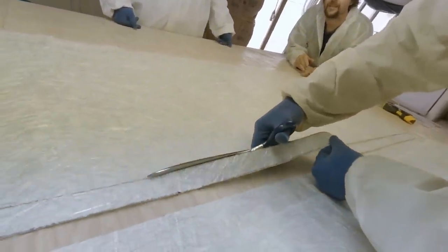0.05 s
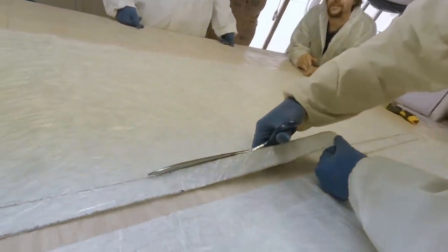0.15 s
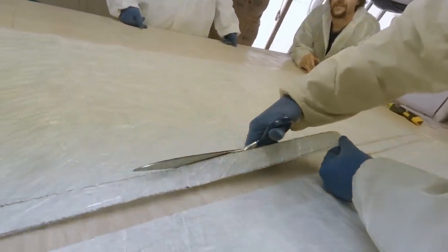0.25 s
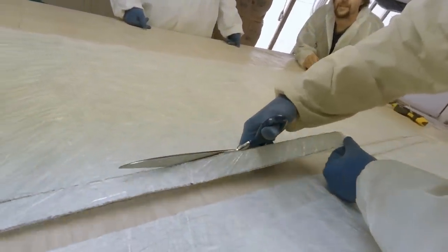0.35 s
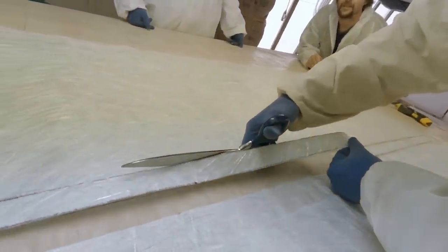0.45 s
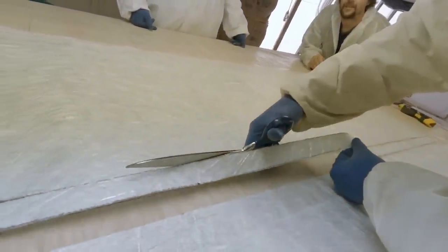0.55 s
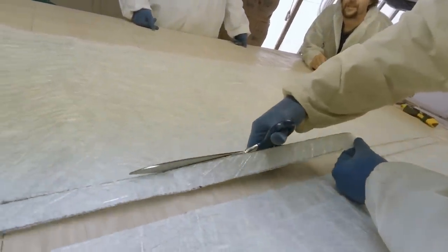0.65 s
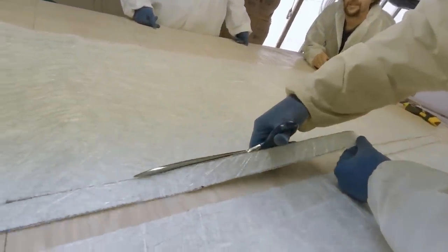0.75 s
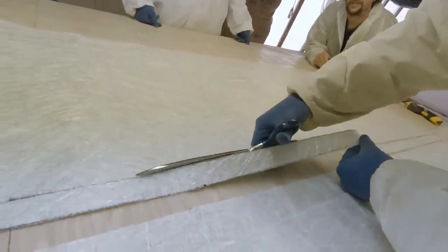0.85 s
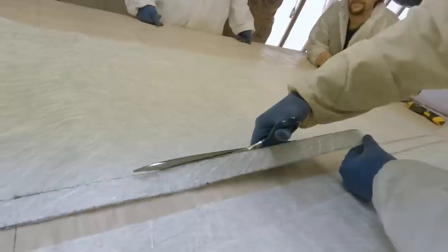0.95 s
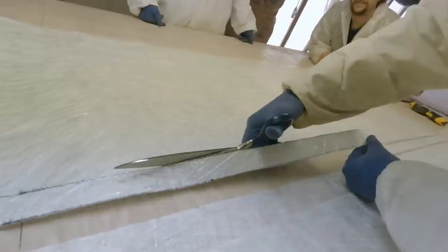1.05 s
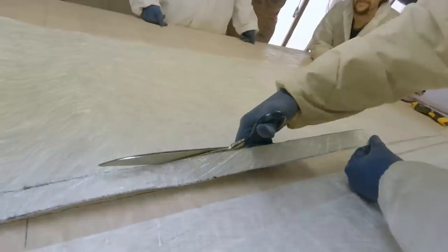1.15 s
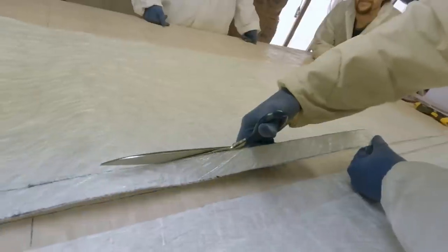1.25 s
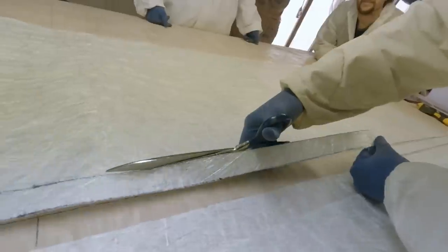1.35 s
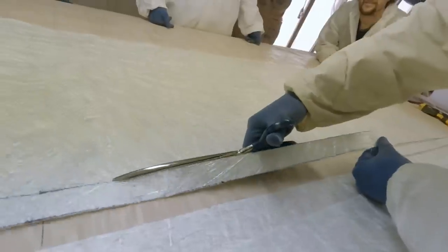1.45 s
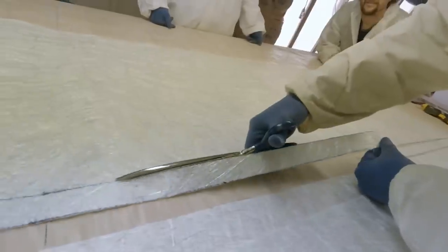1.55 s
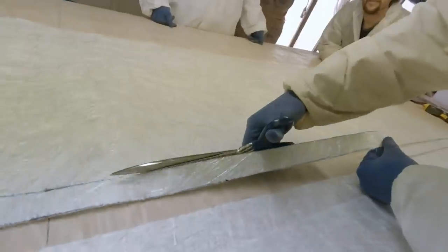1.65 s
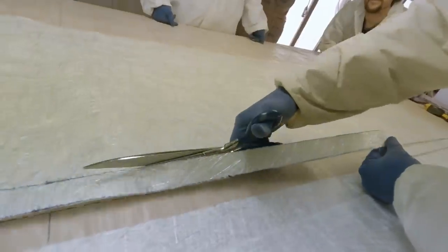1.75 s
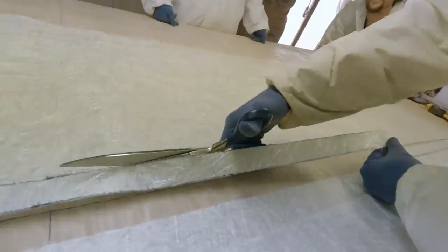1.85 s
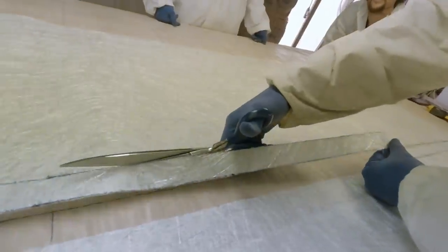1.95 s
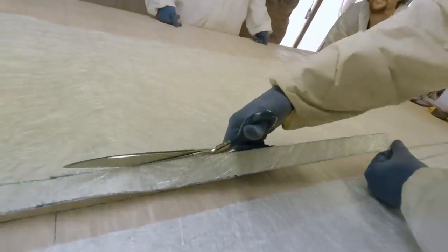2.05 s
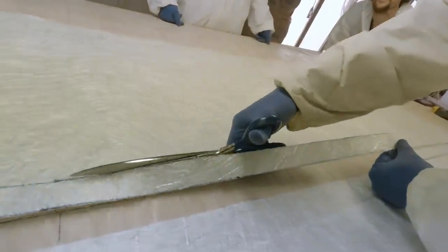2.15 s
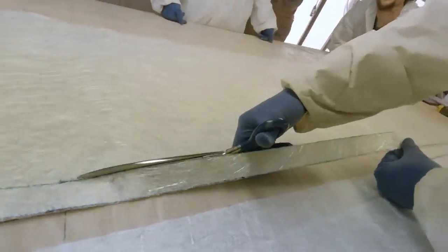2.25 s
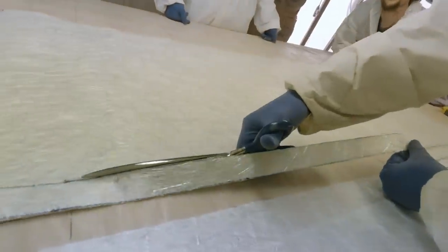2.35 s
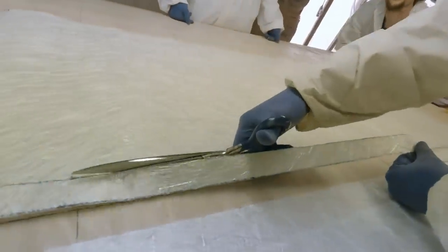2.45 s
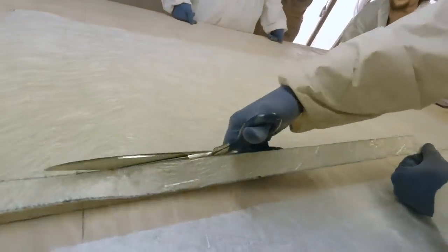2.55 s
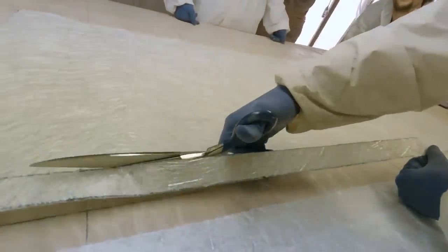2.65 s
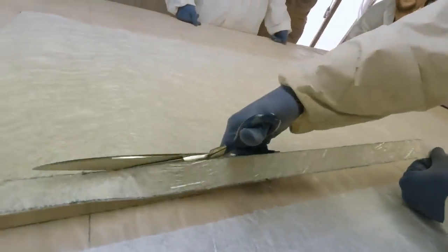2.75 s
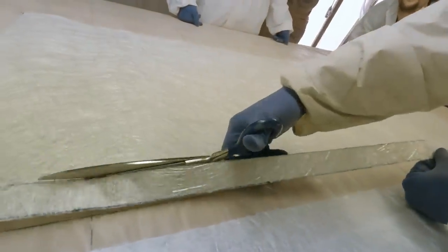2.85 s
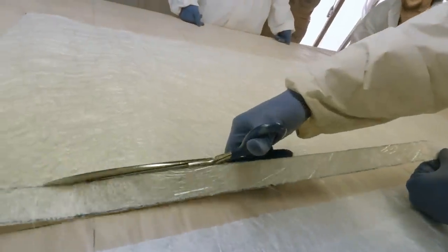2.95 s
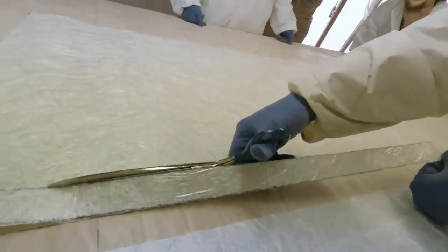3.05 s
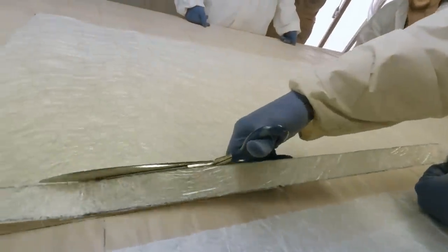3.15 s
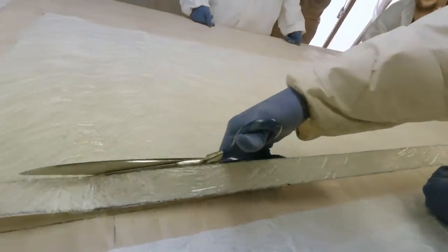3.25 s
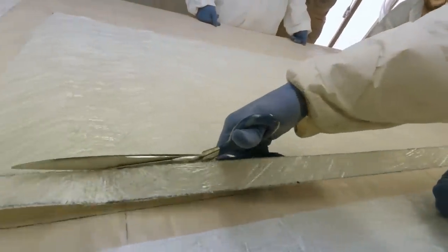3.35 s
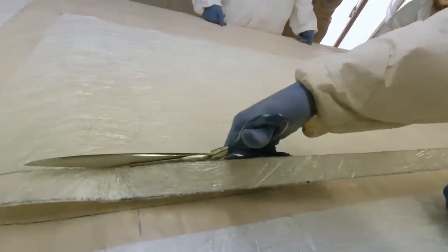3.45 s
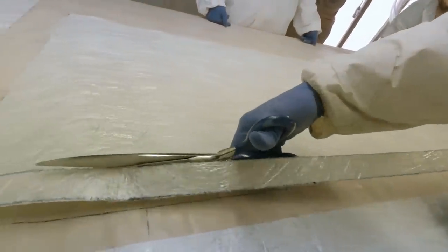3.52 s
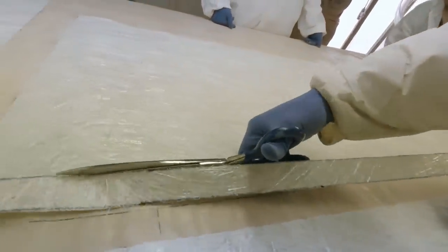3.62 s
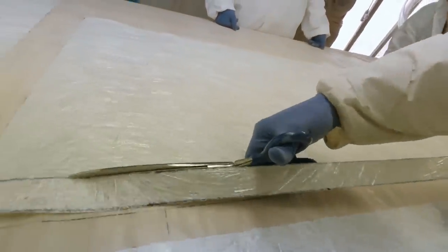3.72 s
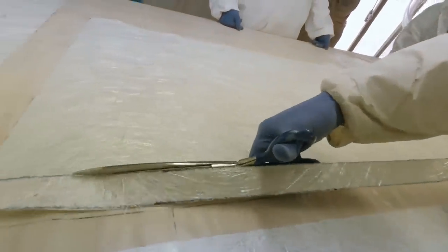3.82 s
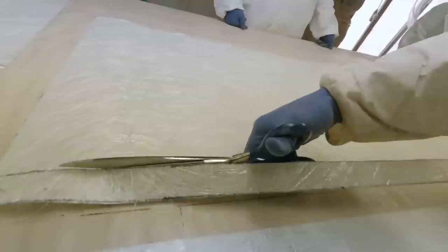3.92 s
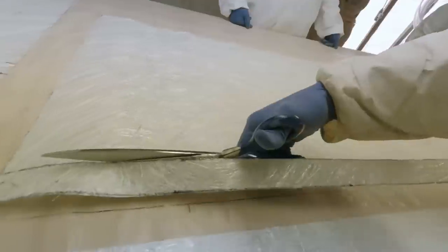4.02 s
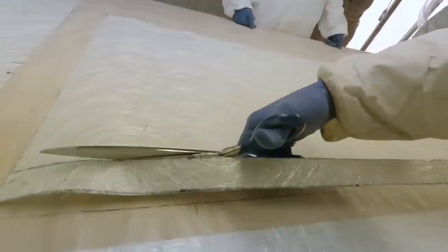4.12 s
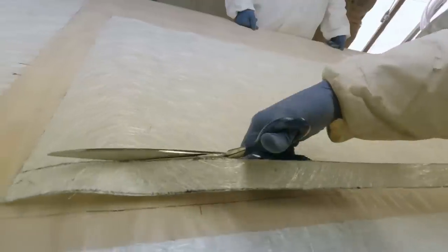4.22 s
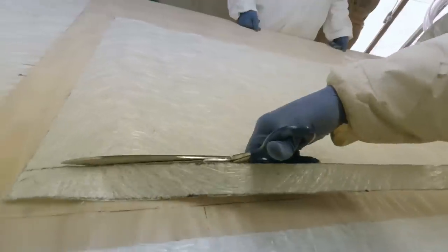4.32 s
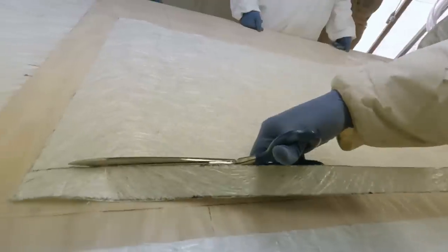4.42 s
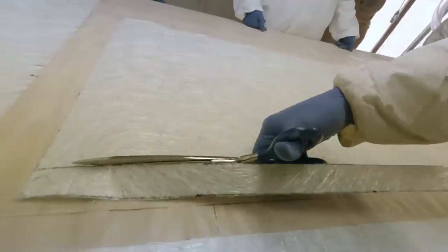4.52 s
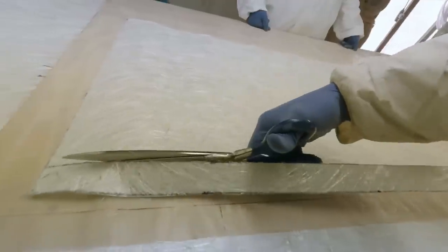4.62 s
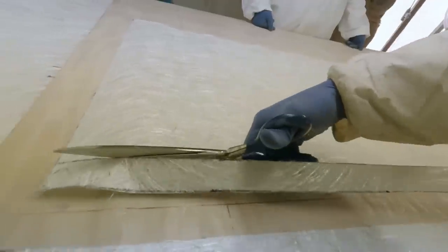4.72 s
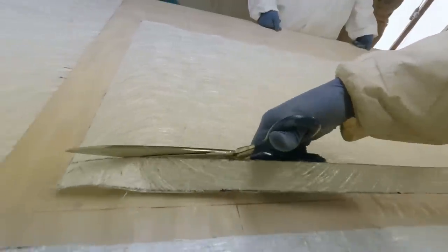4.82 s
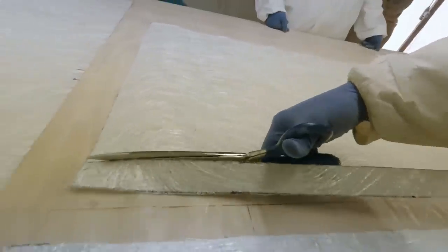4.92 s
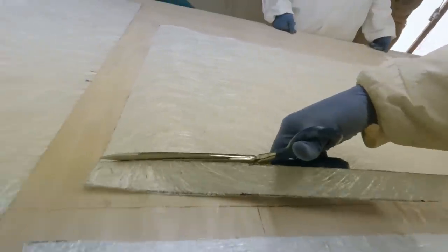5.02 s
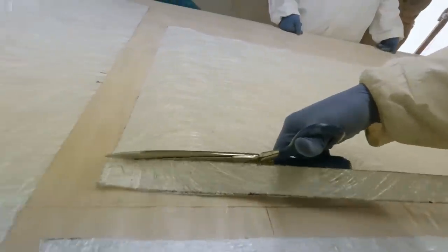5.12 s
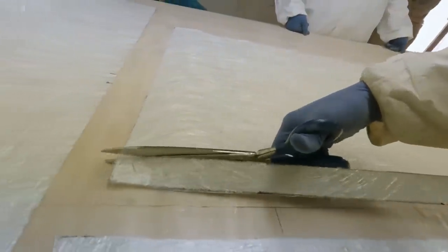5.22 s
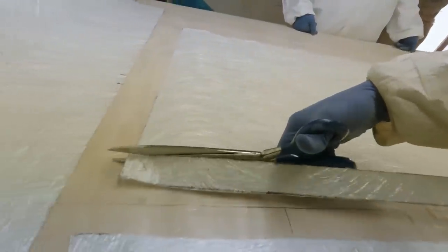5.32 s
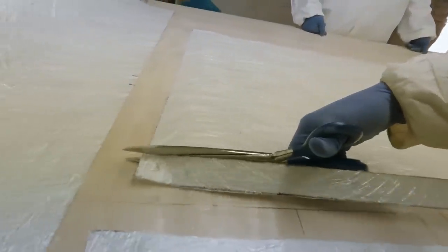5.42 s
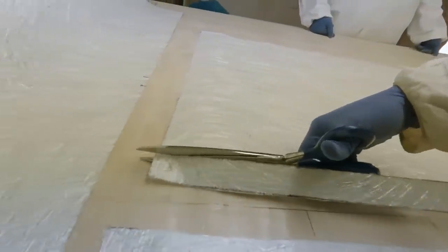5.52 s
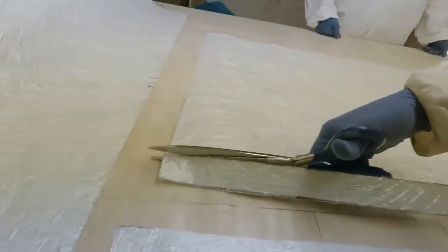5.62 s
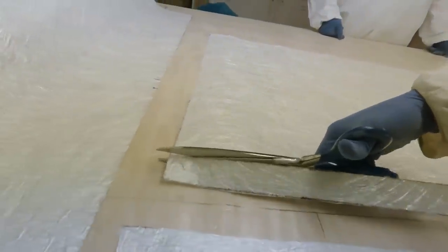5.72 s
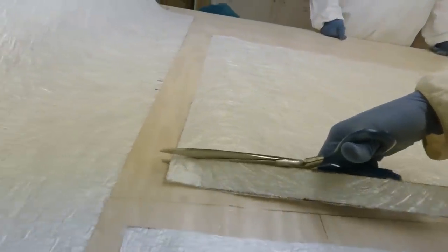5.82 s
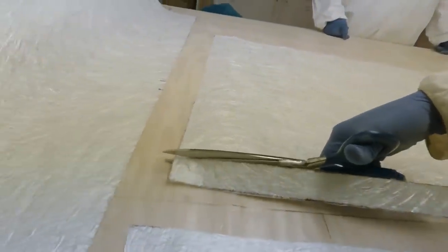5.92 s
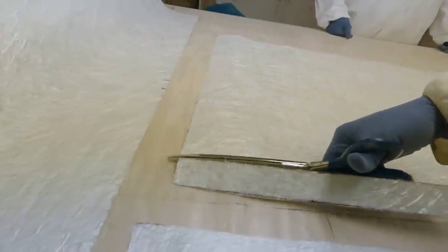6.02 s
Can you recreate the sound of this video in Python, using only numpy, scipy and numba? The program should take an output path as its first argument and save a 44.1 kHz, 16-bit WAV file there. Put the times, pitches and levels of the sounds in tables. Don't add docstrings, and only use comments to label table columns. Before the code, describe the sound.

A steady run of gritty, multi-bite snips from heavy metal shears, each with a woody thump from the table until the later cuts turn thinner and more metallic. Rustling slides, small ticks, light squeals and knuckle bumps fill the gaps. The last cut comes late and shuts with a hard, distorted steel clack. Mono, close and mostly dry, with short dull reverberation, rumble and faint hiss.

```python
import sys
import numpy as np
from scipy import signal
from scipy.fft import rfft, irfft, next_fast_len
from scipy.io import wavfile
from numba import njit

SR = 44100
rng = np.random.default_rng(int(sys.argv[2]) if len(sys.argv) > 2 else 0)


def master_out(mix):
    frames = np.transpose(np.atleast_2d(mix))
    ceiling = np.clip(frames, -1, 1)
    pcm = np.round(ceiling * 32767).astype(np.int16)
    wavfile.write(sys.argv[1], SR, pcm)


def gain_from_db(level_db):
    decades = np.asarray(level_db, float) / 20
    return 10 ** decades


N = 267687
STEP = 40

# first bite t/s, last bite t/s, steady drag on handle level/dB, on table level/dB,
# table jolt relative to blade level/dB
CLOSING_STROKES = [
    (-.2, 0.038, -37.5, -28.5, 11),
    (0.614, 0.824, -39, -36.5, 12.5),
    (1.393, 1.488, -32.5, -35, 11.5),
    (2.111, 2.25, -34.5, -29.5, 14.5),
    (2.81, 3.002, -42, -23, 14.5),
    (3.579, 3.7, -32.5, -27.5, 7.5),
    (4.283, 4.391, -26.5, -30.5, -1.5),
    (4.899, 4.986, -49, -37.5, -15),
    (5.939, 6.046, -36.5, -41, 1),
]


def shears():
    crunch = strands(4500, 2.18, hiss=0.7)
    rub = strands(1500, 2.2, hiss=1.95)
    bite, slide, colour = bite_force(), slide_force(), contact_colour()
    blade = blade_ring(bite[0] * crunch, slide[0] * rub, colour)
    handle = handle_ring(bite[1] * crunch + slide[1] * rub, colour)
    table = table_thud(bite[2] * crunch + slide[2] * rub, colour)
    return blade + handle + table


def blade_ring(cutting, sliding, colour):
    # f/Hz, width f/Hz, level/dB
    blade_modes = [(2533, 67, -6.5), (2980, 63, -4), (3690, 170, -1.5), (4360, 230, -9), (5470, 580, -7.5),
                   (6290, 75, 0.5), (6820, 120, -4), (7660, 610, -1.5), (8625, 304, 4), (10030, 420, -8),
                   (10800, 150, -55), (12000, 390, -5), (13450, 240, 1), (14660, 210, -7)]
    # t/s, peak level/dB
    ticks = [
        (0.8809, -43),
        (0.9512, -32),
        (1.1323, -31),
        (1.856, -36),
        (2.3805, -37.5),
        (2.6223, -29),
        (3.2879, -28),
        (4.1954, -39),
        (5.8102, -37.5),
    ]
    # t/s, level/dB
    glints = [(.2, -57), (.225, -41), (.98, -46), (1.005, -46), (1.15, -57), (1.7, -33.5), (2.455, -47),
              (2.49, -32), (3.16, -40), (3.215, -41.5), (3.95, -43), (5.2, -38), (5.47, -43.5), (5.49, -52),
              (5.51, -63)]
    # f/Hz, width f/Hz, level/dB
    squeal_modes = [(2850, 16, 7), (5000, 30, -20), (6350, 72, -2), (8360, 100, 4), (9500, 40, 8.5),
                    (11720, 56, 13), (13250, 69, 10.5), (14700, 40, 2)]
    hiss_modes = [(4997, 1900, -1.5), (9100, 950, 10.0), (12500, 2900, -21)]   # f/Hz, width f/Hz, level/dB

    struck = cutting + 0.5 * puffs(ticks, t60=0.016)
    grazed = puffs(glints, t60=0.09) + gain_from_db(-16) * sliding
    out = body(struck, blade_modes, 4.62, (2100, 15800), -9.5, colour, rate=48.0, bend_db=0.07)
    out += body(sliding, hiss_modes, 0.74, (2300, 15800), 2.5, colour)
    out += body(grazed, squeal_modes, 6, (2300, 15800), -60, colour, rate=15, bend_db=0.12)
    return out


def handle_ring(force, colour):
    # f/Hz, width f/Hz, level/dB
    handle_modes = [(561, 78, -9), (720.8, 50.3, 5), (775, 14, -6.5), (1048, 31, -1.5), (1197.6, 34, -6.5),
                    (1279, 35, -3.5), (1432, 29, -14.5), (1647, 48, -10.5), (1798, 112, -16.5)]
    return body(force, handle_modes, 2.75, (420, 2100), -15.0, colour, bend_db=0.16)


def table_thud(force, colour):
    # f/Hz, width f/Hz, level/dB
    table_modes = [(145, 16, -15.5), (191.3, 40.7, -0.5), (226, 33.7, 1), (273.6, 49, -0.5),
                   (330, 119, -10), (415, 156, -12.5)]
    thud = body(force, table_modes, 2.08, (90, 480), -15.0, colour)
    return signal.lfilter(*signal.butter(2, 560, fs=SR), thud)


def bite_force():
    # t/s, blade level/dB, handle relative level/dB, rise t/ms per 10 dB
    bites = [(.005, -26.5, 8.5, 20), (0.63, -29, 2.5, 19.5), (0.677, -30, 10, 11), (0.719, -27.5, 12, 9.5),
             (0.742, -32.5, 11.5, 10.5), (.791, -28, 13, 6), (1.393, -24, 2, 13.5), (1.459, -29.5, 8, 19.5),
             (1.493, -27, 6.5, 11.5), (2.125, -27.5, 8, 20.5), (2.179, -24, 8.5, 12.5),
             (2.222, -28.5, 12, 9.5), (2.252, -28.5, 5.5, 10.5), (2.278, -29, 9, 8),
             (2.825, -30.5, 7.5, 16.5), (2.867, -24.5, 7.5, 11), (2.918, -27, 6, 11.5),
             (2.937, -28.5, 8.5, 14), (3.005, -23.5, 3.5, 10), (3.598, -24.5, 4, 12.5),
             (3.63, -29.5, 10, 11), (3.648, -27, 11.5, 18), (3.696, -24, 11, 11.5), (4.287, -23, 2.5, 10),
             (4.332, -29.5, 10.5, 20), (4.356, -32, 6.5, 20), (4.394, -31.5, 3, 7), (4.909, -28.5, 5.5, 27),
             (4.941, -29.5, 13, 21), (6.02, -18.5, 6.5, 9)]
    # t/s, blade level/dB, handle relative level/dB
    nibbles = [(0.084, -48, 2), (0.563, -46, 4), (.585, -43.5, 1.5), (0.763, -36.5, 6), (1.327, -40, 3.5),
               (1.355, -38, 5), (1.518, -34.5, -14), (2.07, -42.5, 6), (2.102, -30.5, 3), (2.78, -46.5, 10),
               (2.965, -42, 15), (3.037, -39.5, 3), (3.069, -44, -2), (3.544, -36, 2.5), (4.238, -42.5, -8),
               (4.253, -33, 8), (4.373, -35, 13.5), (4.419, -37.5, 11.5), (4.882, -46, 10.5),
               (4.972, -37.5, 9), (4.996, -46, 2), (5.873, -42.5, 3.5), (5.884, -37.5, 1.5),
               (5.922, -43.5, 1), (5.945, -41.5, 1), (5.966, -33, 10.5), (6.054, -25.5, 5.5)]
    nibble_lead_s, nibble_rise_ms, nibble_fall_ms = 0.0026, 5.6, 12.9

    t, power = np.arange(N) / SR, np.zeros((3, N))
    first, last, *_, jolt_db = np.transpose(CLOSING_STROKES)
    big = [(*row, row[-1] * 0.95) for row in bites]
    small = [(s - nibble_lead_s, *row, nibble_rise_ms, nibble_fall_ms) for s, *row in nibbles]
    for s, db, handle_db, rise_ms, fall_ms in big + small:
        stroke = np.argmin(abs(s - (first + last) / 2))
        table_db = jolt_db[stroke] + 0.074 * (handle_db - 12)
        near = slice(max(round((s - 0.06) * SR), 0), round((s + 0.08) * SR))
        away_ms = (t[near] - s) * 1000 + np.array([[0], [3.0], [3.0]])
        rise = max(rise_ms, 2) * np.array([[1], [0.6], [0.7]])
        fall = max(fall_ms, 2) * np.array([[1], [1.3], [1.2]])
        distance = np.where(away_ms < 0, -away_ms / rise, away_ms / fall)
        shape_db = db - 10 * distance ** 1.92
        power[:, near] += gain_from_db(shape_db + np.array([[0], [handle_db - 0.5], [table_db]])) ** 2
    return np.sqrt(power + drag_force() ** 2)


def drag_force():
    t, force = np.arange(N // STEP + 1) * STEP / SR, 0
    steepness = np.array([[2.5], [1], [0.8]])
    for first, last, handle_db, table_db, _ in CLOSING_STROKES:
        shape_db = stroke_shape(t, first, last, rise_db_per_s=396, fall_db_per_s=277)
        level_db = np.array([[handle_db - 12], [handle_db], [table_db]])
        force = force + gain_from_db(shape_db * steepness + level_db)
    return np.repeat(force, STEP, axis=1)[:, :N]


def slide_force():
    # start t/s, stop t/s, blade level/dB, handle and table relative level/dB
    slides = [
        (0.15, 0.416, -46, 1, 7),
        (0.963, 1.197, -45.5, -2.5, 8.5),
        (1.658, 1.9, -47, -0.5, 10.5),
        (2.414, 2.689, -47.5, -2.5, 10),
        (3.119, 3.402, -50, 0.5, 10.5),
        (3.853, 4.118, -48.5, 2.5, 7),
        (4.538, 4.768, -50.5, 1.5, -3),
        (5.114, 5.303, -49.5, -2.5, -3.5),
        (5.485, 5.527, -58, 5, 8),
        (5.59, 5.663, -65.5, -9, -1),
    ]
    # share of the slide, blade level/dB, handle level/dB, table level/dB
    push_curve = [(0, -0.5, -1.5, -2), (.3, 2.5, 1.5, 6), (.6, -0.5, 1.5, 7.5), (.9, 2, -4, 3),
                  (1, -0.5, -5, -6)]

    t, force = np.arange(N // STEP + 1) * STEP / SR, 0
    share, *push = np.transpose(push_curve)
    for start, stop, db, handle_db, table_db in slides:
        progress = (t - start) / (stop - start)
        push_db = np.array([np.interp(progress, share, column) for column in push])
        shape_db = stroke_shape(t, start, stop, rise_db_per_s=450, fall_db_per_s=420)
        force = force + gain_from_db(db + shape_db + push_db + np.array([[0], [handle_db], [table_db]]))
    weave = [wander(1.9, 60), wander(0.55, 40), wander(4.2, 39)]
    return np.repeat(force * weave, STEP, axis=1)[:, :N]


def stroke_shape(t, start, stop, rise_db_per_s, fall_db_per_s):
    return -rise_db_per_s * np.maximum(start - t, 0) - fall_db_per_s * np.maximum(t - stop, 0)


def contact_colour():
    contact = [(-1, -0.5, 3, 0.5), (0, 4.5, -2, -3), (0.13, 3, 3.5, 6.5), (1, 1.5, 11, -3.5),
               (3.5, -5, -22, -8.5)]
    # t/s, main handle mode level/dB, lesser handle modes level/dB
    grip = [(0, -2, -1), (.7, -2, 2.5), (3, 0, 0), (3.7, 2, 0), (4.4, -0.5, -2.5), (4.65, 2.5, -2.5),
            (5.25, 0.5, -1), (5.5, -14, 4.5), (6, 2.5, -1)]

    t = np.arange(N // STEP + 1) * STEP / SR
    first, last, *_ = np.transpose(CLOSING_STROKES)
    now = np.argmin(abs(t[:, None] - (first + last) / 2), axis=1)
    progress = (t - first[now]) / (last - first)[now]
    share, *columns = np.transpose(contact)
    side, low, top = [gain_from_db(np.interp(progress, share, column)) for column in columns]
    s, *grip_db = np.transpose(grip)
    main, lesser = [gain_from_db(np.interp(t, s, column)) for column in grip_db]

    def colour(hz):
        if hz < 450 or 5000 < hz < 10000:
            return np.ones(len(t))
        if 680 < hz < 760:
            return main
        if hz < 2200:
            return side * lesser
        return low if hz < 5000 else top

    return colour


def strands(per_s, spread_db, hiss):
    sizes = gain_from_db(spread_db * np.minimum(rng.exponential(1, N), 4)) * rng.choice([-1, 1], N)
    breaks = rms_one(sizes * (rng.random(N) < per_s / SR))
    return rms_one(breaks + hiss * rng.standard_normal(N))


def puffs(rows, t60):
    s, db = np.transpose(rows)
    decay = gain_from_db(-60 / (t60 * SR))
    dying = signal.lfilter([1], [1, -decay], clicks_at(s, gain_from_db(db)) + 1e-18)
    return dying * rng.standard_normal(N)


def body(force, modes, wander_db, bed_hz, bed_db, colour, rate=14, bend_db=-0.1459):
    force = force + 1e-15 * rng.standard_normal(N)
    power = gain_from_db(bed_db) ** 2 * 2 * (bed_hz[1] - bed_hz[0]) / SR
    bed_colour = per_sample(colour(np.sqrt(np.prod(bed_hz))))
    out = gain_from_db(bed_db) * band(force * bed_colour, *bed_hz)
    for k, (hz, width_hz, db) in enumerate(modes):
        width_hz = max(width_hz, 26 + 0.008 * hz)
        coupling = (-1) ** k * gain_from_db(db) * colour(hz) * wander(wander_db, rate)
        cosine = np.cos(2 * np.pi * hz / SR * wander(bend_db, 5))
        out += resonate(force, coupling, cosine, np.exp(-np.pi * width_hz / SR), STEP)
        power += gain_from_db(db) ** 2 * np.pi * width_hz / SR
    return out / np.sqrt(power)


@njit
def resonate(x, gain, cosine, r, step):
    y = np.zeros(len(x))
    for i in range(2, len(x)):
        k = i // step
        drive = gain[k] * (1 - r * r) / 2 * (x[i] - x[i - 2])
        y[i] = drive + 2 * r * cosine[k] * y[i - 1] - r * r * y[i - 2]
    return y


def snap():
    # t/s, level/dB
    hits = [
        (6.0572, -12),
        (6.0582, 0),
        (6.0596, -3),
        (6.0613, -4),
        (6.064, -4),
        (6.0672, -7),
    ]
    # f/Hz, level/dB, decay t60/s
    snap_modes = [(150, -8, .04), (480, -7, .04), (920, -5, .04), (1450, -5, .02), (1950, -5, .018),
                  (2400, -1, .018), (3180, -9, .02), (3870, -7, .02), (4350, -8, .015), (7700, -12, .01),
                  (13500, -20, .006)]
    s, db = np.transpose(hits)
    luck_db = rng.normal(0, 4.5, (len(s), len(snap_modes)))
    out = 0
    for k, (hz, mode_db, t60) in enumerate(snap_modes):
        clicks = clicks_at(s, gain_from_db(db + mode_db - 1 + luck_db[:, k]))
        out = out + ring(clicks, hz, t60)
    return out


def bumps():
    # t/s, peak level/dB, f/Hz, decay t60/s
    knocks = [(0.1356, 0.5, 290, 0.021), (0.15, -5.5, 237, 0.0087), (0.165, -18, 190, 0.02),
              (0.175, -36, 330, 0.013), (1.623, -20, 210, 0.063), (1.638, -20, 123, 0.11),
              (2.38, -16.5, 124, 0.055), (2.419, -22.5, 105, 0.036), (3.065, -15.5, 122, 0.08),
              (3.089, -29, 99.5, 0.34), (5.04, -28, 111, 0.079), (5.499, -38.5, 267, 0.14)]
    out = sum(ring(clicks_at([s], gain_from_db(db)), hz, t60) for s, db, hz, t60 in knocks)
    return signal.sosfilt(signal.butter(3, [75, 620], "band", fs=SR, output="sos"), out)


def ring(clicks, hz, t60):
    r, w = gain_from_db(-60 / (t60 * SR)), 2 * np.pi * hz / SR
    return signal.lfilter([0, np.sin(w)], [1, -2 * r * np.cos(w), r * r], clicks + 1e-18)


def clicks_at(seconds, heights):
    out = np.zeros(N)
    out[(np.asarray(seconds) * SR).astype(int)] = heights
    return out


def shed(x, t60, cut_hz):
    size = next_fast_len(N + SR)
    w = 2 * np.pi * np.arange(size // 2 + 1) / size
    dull = 1 / (1 + 1j * w * SR / (2 * np.pi * cut_hz))
    answer = 0
    lags = (rng.uniform(0.012, 0.04, 8) * SR).astype(int)
    for k, lag in enumerate(lags):
        loop = gain_from_db(-60 * lag / SR / t60) * dull * np.exp(-1j * w * lag)
        answer = answer + (-1) ** k * loop / (1 - loop)
    return irfft(rfft(x, size) * answer, size)[:N]


def noise_floor():
    # f/Hz, level/dB per Hz
    spectrum = [(22, -22), (35, -2.5), (62, 7.5), (110, 1), (330, -16.5), (1400, -27.5), (8000, -33.5),
                (15500, -40)]
    hz, db = np.transpose(spectrum)
    edges = 24 * 2 ** np.arange(0, 9.6, 0.5)
    white, out = rng.standard_normal((2, N + SR)), 0
    for k, (low, high) in enumerate(zip(edges, edges[1:])):
        level_db = np.interp(np.log(low * high) / 2, np.log(hz), db)
        noise = band(white[k % 2], low, high)[SR:]
        out = out + gain_from_db(level_db) * per_sample(wander(0.41, 2.6)) * noise
    return gain_from_db(-42.5) * rms_one(out)


def handling():
    low_pass = signal.butter(6, 16, fs=SR, output="sos")
    sway = signal.sosfilt(low_pass, rng.standard_normal(N + SR))[SR:]
    return gain_from_db(-39.5) * per_sample(wander(2.4, 0.47)) * rms_one(sway)


def wander(db, rate):
    r = np.exp(-2 * np.pi * STEP * rate / SR)
    slow = signal.lfilter([1], [1, -2 * r, r * r], rng.standard_normal(N // STEP + 2001))[2000:]
    return gain_from_db(db * np.clip(rms_one(slow), -3, 2))


def per_sample(slow):
    return np.repeat(slow, STEP)[:N]


def band(x, low_hz, high_hz):
    return signal.sosfilt(signal.butter(2, [low_hz, high_hz], "band", fs=SR, output="sos"), x)


def rms_one(x):
    return x / np.sqrt(np.mean(x ** 2) + 1e-20)


def scene():
    work = shears() + bumps() + snap()
    mono = work + gain_from_db(-13) * shed(work, t60=0.23, cut_hz=1460) + noise_floor() + handling()
    return np.array([mono, mono])


def top_cut(x):
    return signal.sosfilt(signal.butter(12, 15680, fs=SR, output="sos"), x)


def record(dry):
    mono = dry[0]
    flutter = gain_from_db(-26) * band(mono, 4000, 15500) * rms_one(band(rng.standard_normal(N), 20, 400))
    flutter += gain_from_db(-32) * band(mono, 1350, 3800) * rms_one(band(rng.standard_normal(N), 30, 300))
    flutter += gain_from_db(-47.5) * band(mono, 6.6, 3800) * rms_one(band(rng.standard_normal(N), 5.5, 210))
    mix = np.clip(dry + flutter * [[1], [-1]], -1, 1)
    return top_cut(mix)


dry = scene()
out = record(dry)
master_out(out)
```